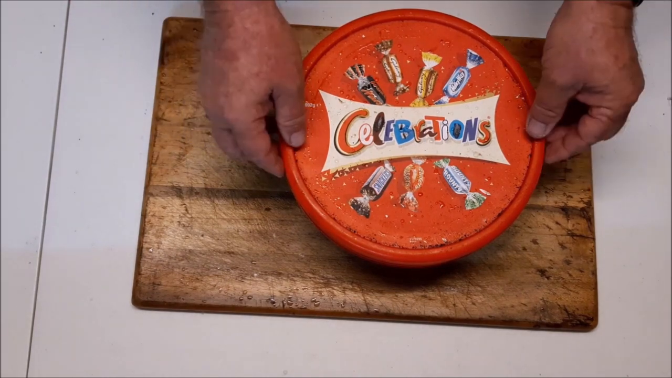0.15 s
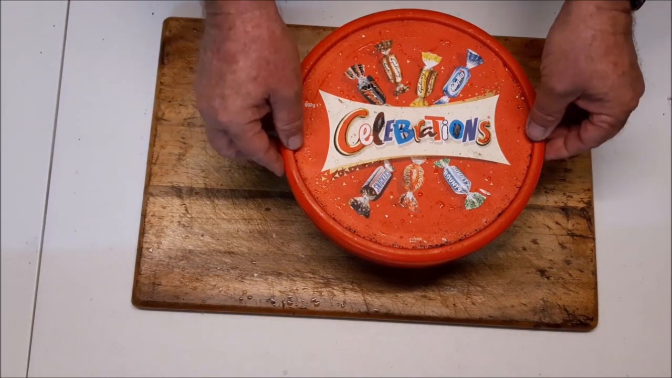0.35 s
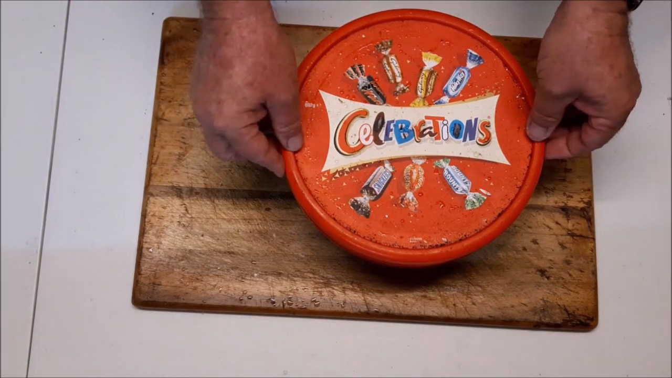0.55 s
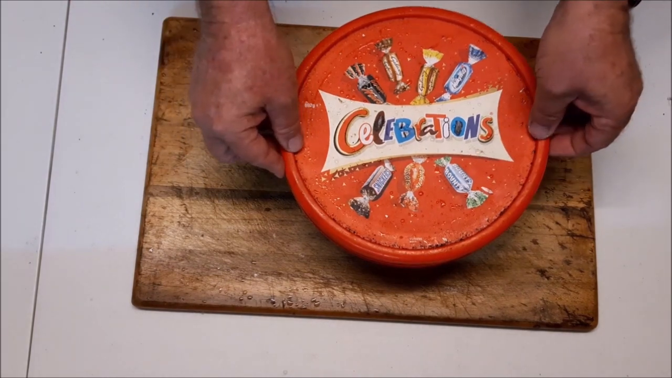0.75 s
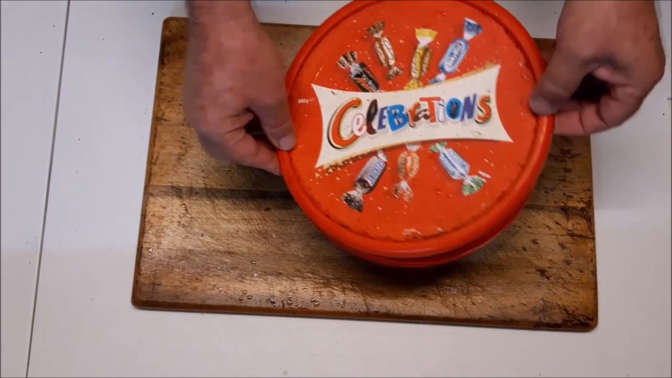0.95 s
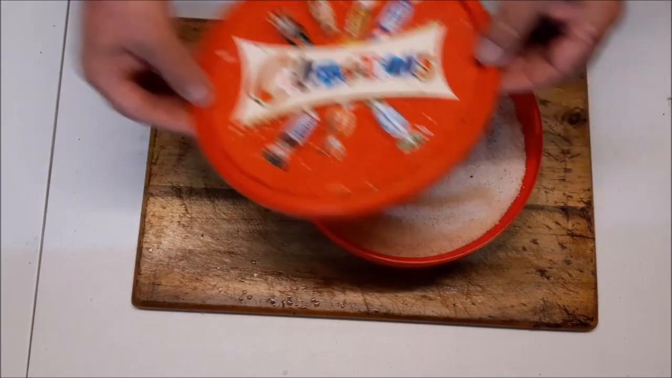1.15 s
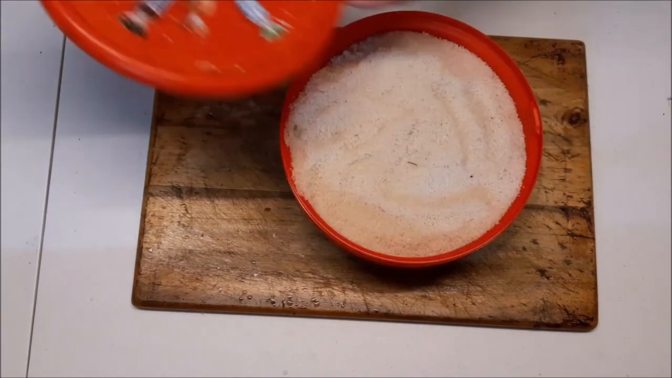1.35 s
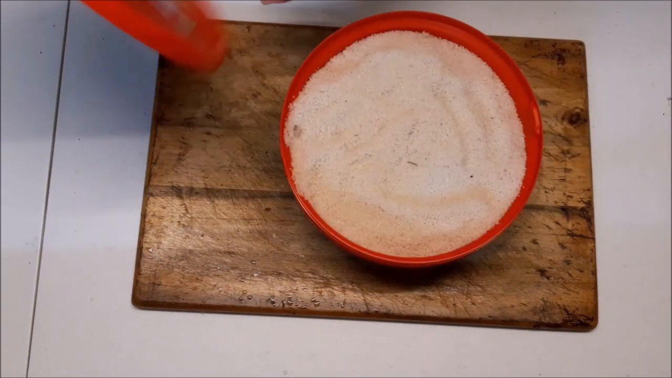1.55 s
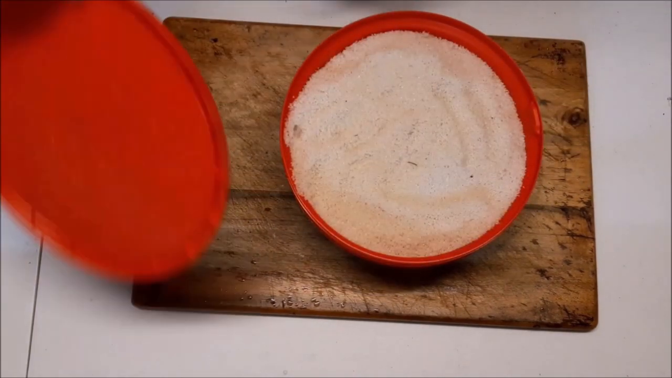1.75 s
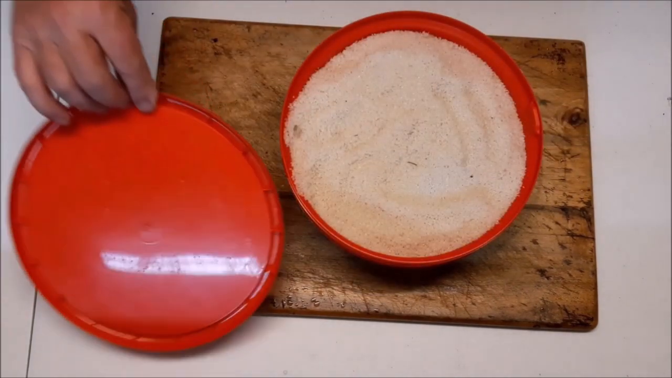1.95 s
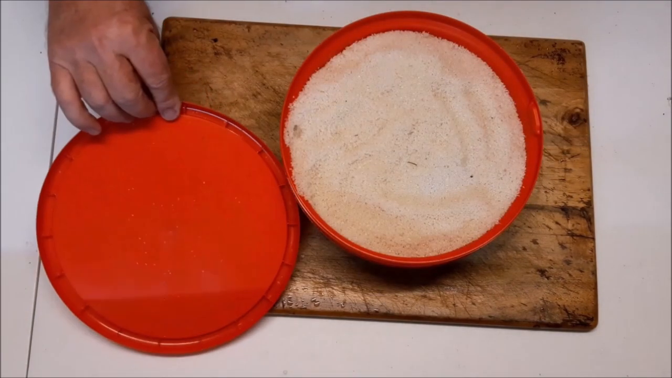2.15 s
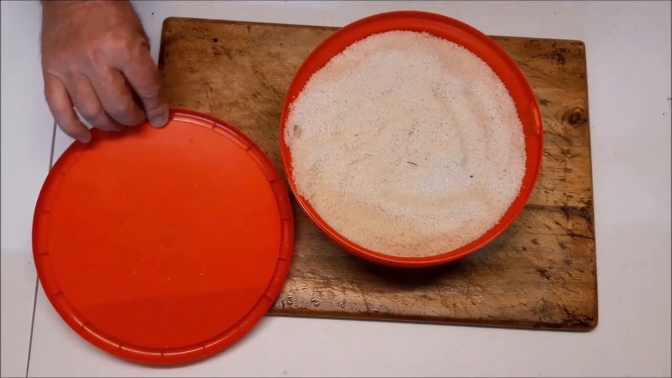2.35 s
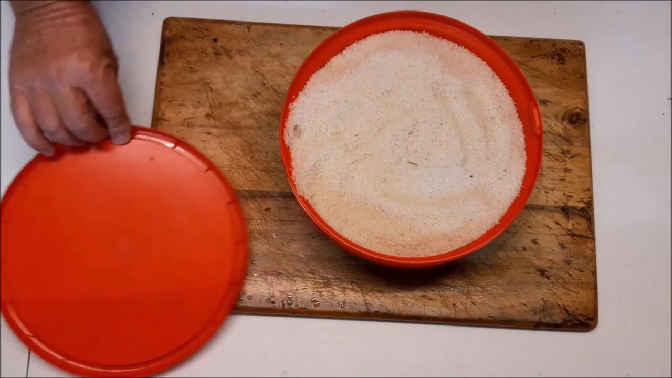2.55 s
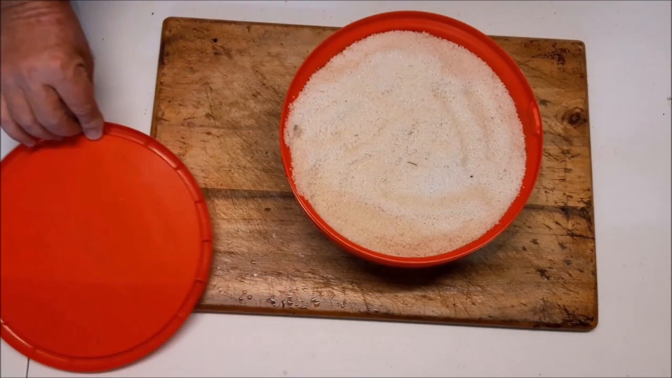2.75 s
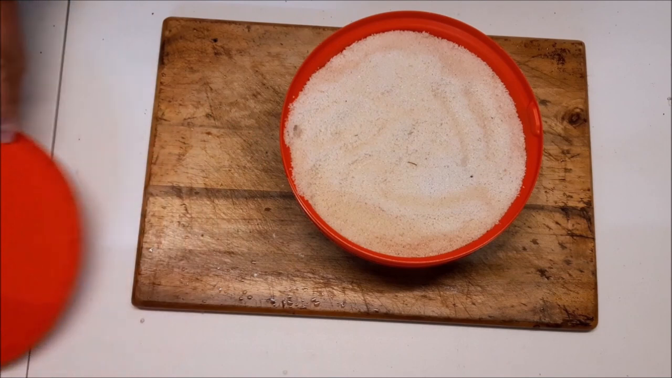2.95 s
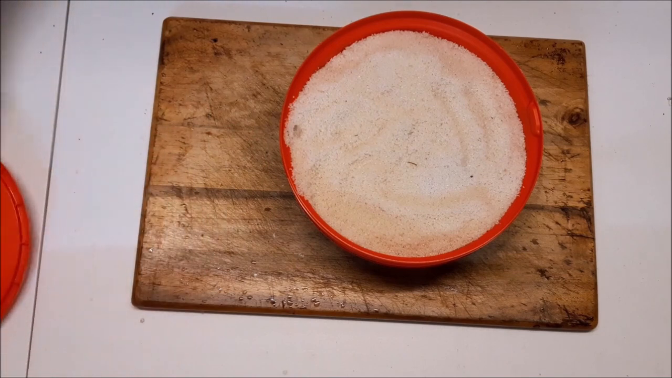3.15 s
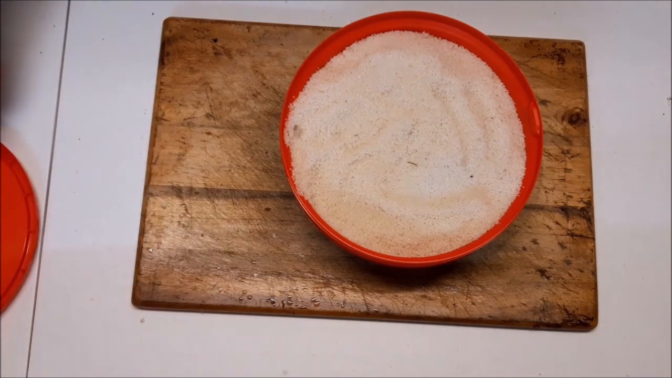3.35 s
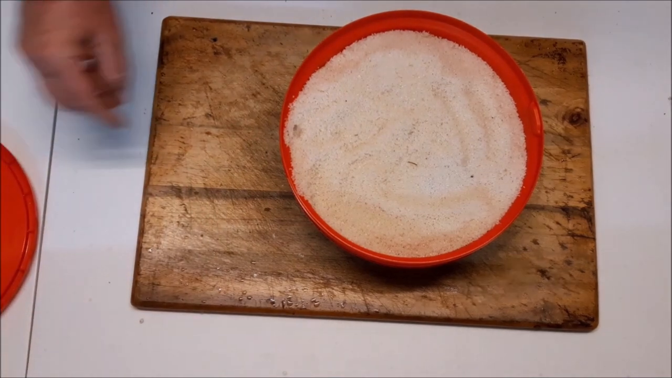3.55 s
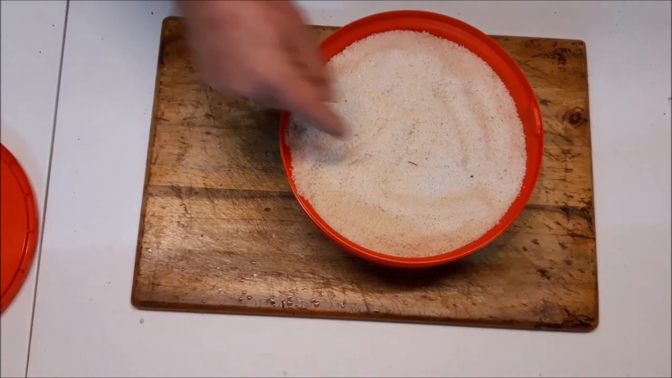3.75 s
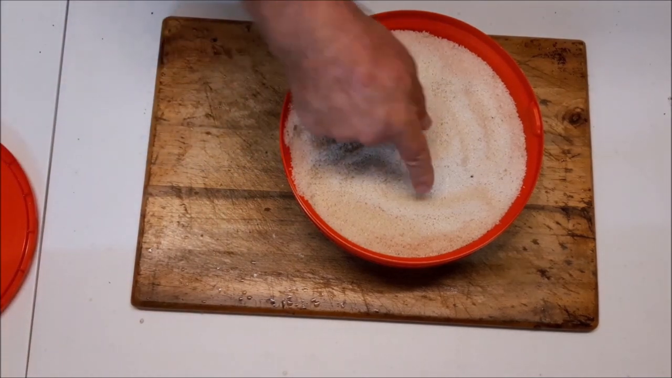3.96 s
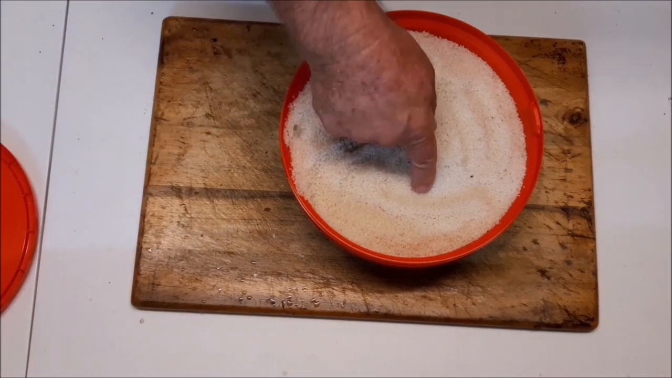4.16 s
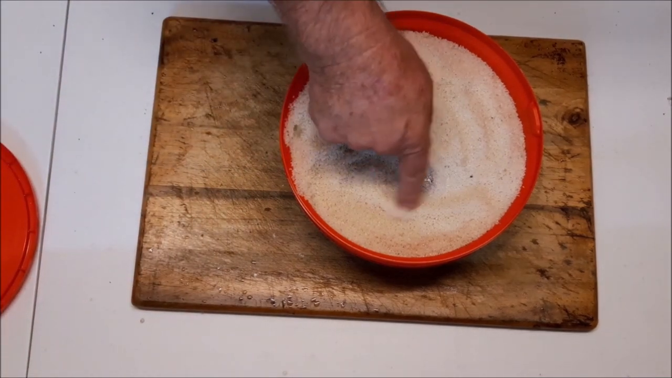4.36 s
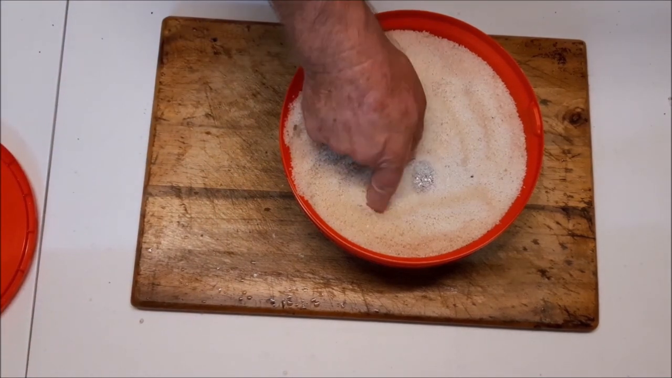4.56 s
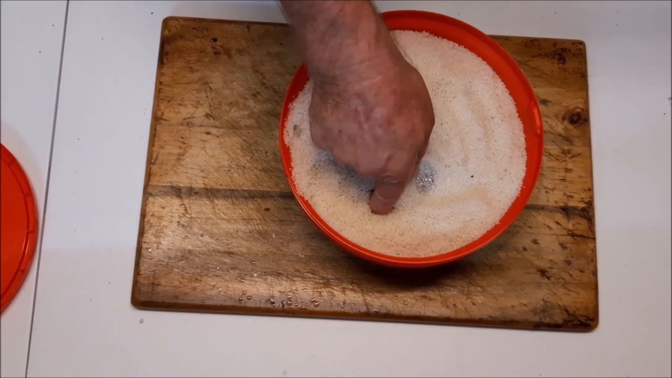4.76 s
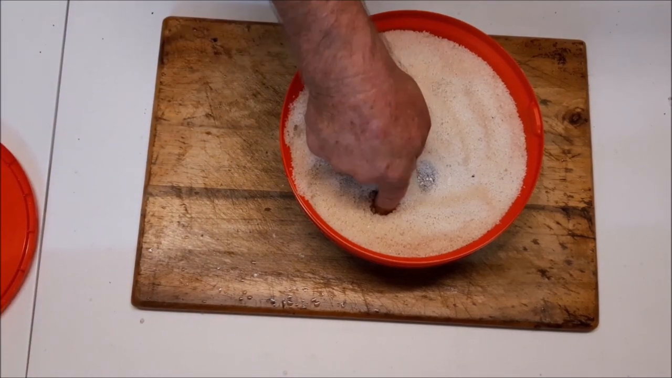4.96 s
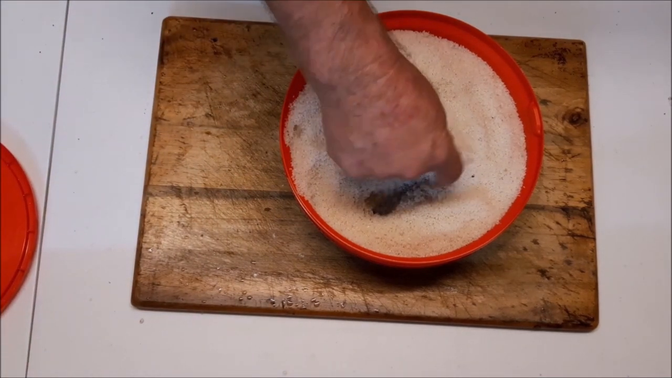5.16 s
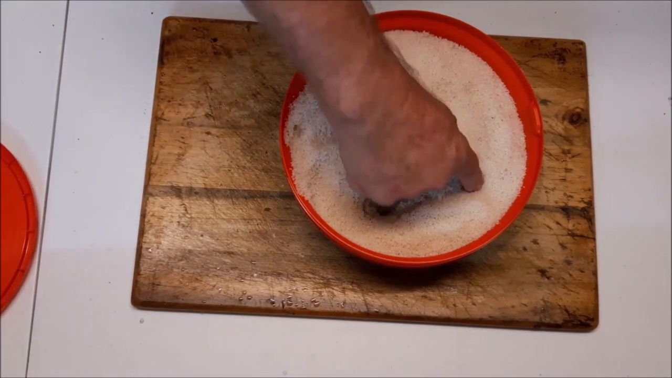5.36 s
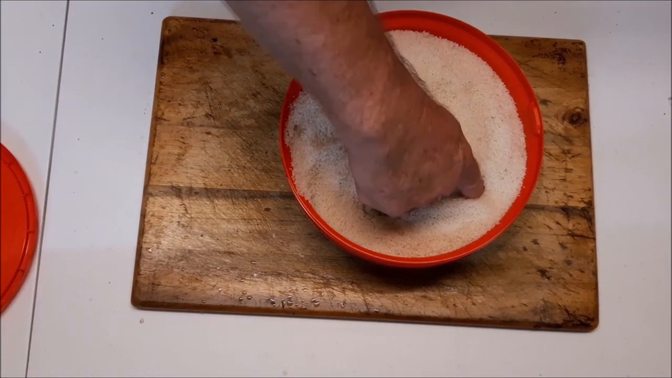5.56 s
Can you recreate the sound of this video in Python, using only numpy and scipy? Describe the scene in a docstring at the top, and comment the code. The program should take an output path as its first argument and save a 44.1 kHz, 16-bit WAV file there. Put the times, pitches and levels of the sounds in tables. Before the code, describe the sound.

A low, wavering rumble and faint hiss run throughout a small, hard-walled kitchen, with the microphone close. After a tiny tick around 0.4 s, a plastic lid is prised off a tub at 0.73-0.9 s: a dense flurry of sharp, hollow snaps with brief rasping drags and a low bump. Small ticks follow at 1.0-1.3 s, a brighter click at 1.45 s, and barely audible finger rustle until 1.65 s. The lid edge strikes the worktop loudly at 2.1 s and again at 2.2 s, then slides softly with knocks from 2.55 to 2.95 s. More clacks come at 3.1 s and a quick final clatter at 3.35 s, each with a short room tail. Quiet follows, until a finger scratches coarse salt in soft, dry, gritty strokes: short ones at 4.1-4.3 s, fuller crunches at 4.55-5.15 s, and a very faint brush at 5.4-5.55 s.

```python
"""A low rumble and a faint hiss come first and last throughout: a wavering sine, resonant noise, coloured noise.
A plastic lid is prised off a tub in a hard-walled kitchen: impulses ring damped modes, stick-slip drives them.
Fingers rustle on the lid in the air; it is knocked and slid on the worktop and laid down, by the same principles.
Then a finger scrapes through the coarse salt in the tub: clumped random grains, shaped in spectrum.
The room answers with early echoes and a diffuse, decaying tail of noise."""
import sys
import numpy as np
from scipy import signal
from scipy.fft import rfft, irfft
from scipy.io import wavfile

SR = 44100
rng = np.random.default_rng(int(sys.argv[2]) if len(sys.argv) > 2 else 0)


def wav_record(signal):
    """Record a signal, one row per channel, as 16-bit PCM in the file named by sys.argv[1]."""
    frames = np.transpose(np.atleast_2d(signal))
    bounded = np.clip(frames, -1, 1)
    # unit amplitude maps onto the largest positive 16-bit level
    quanta = np.round(bounded * 32767).astype(np.int16)
    wavfile.write(sys.argv[1], SR, quanta)


N = 247080

# Level of the low hum: time_s, level_db
HUM_LEVELS = [(0.0, -61), (0.11, -54.5), (0.58, -63), (0.81, -50), (0.86, -56), (1.64, -49.5), (1.68, -59),
              (1.78, -54.5), (2.28, -59), (2.32, -66), (2.68, -49), (2.87, -58), (2.98, -49), (3.51, -59.5),
              (4.74, -62.5), (5.16, -74), (5.19, -65), (5.6, -58)]
# Levels of two low resonances above the hum, swelling as the lid is prised and as the worktop thumps:
# time_s, lower_db, upper_db
LOW_RESONANCE_LEVELS = [(0.0, -59, -76), (0.72, -61.5, -70.5), (0.78, -49.5, -43), (1.11, -59.5, -65),
                        (2.23, -55, -59), (2.35, -64, -67), (3.54, -55.5, -51), (3.68, -65, -64),
                        (5.52, -59.5, -63), (5.6, -58, -70.5)]
# Spectrum of the air noise: frequency_hz, relative_density_db
AIR_SPECTRUM = [(25, -33), (50, -8.5), (75, -8.5), (160, -20.5), (190, -16), (277, -22), (394, -24.5),
                (516, -25.5), (700, -21.5), (1020, -27.5), (1400, -42.5), (1890, -48), (3000, -46),
                (4250, -44.5), (16000, -47)]
# Faint steady bands in the hiss: centre_hz, width_hz (between points about 9 dB down), level_db
HISS_BANDS = [(4200, 150, -86), (6140, 860, -84)]
# Lid rim slipping off the tub, and nails ticking on it: time_s, crack_db, body_db, splinter_db, crack_hz
TUB_SNAPS = [(0.4445, -39, -60.5, -48, 3620), (0.7259, -42, -45.5, -48, 3980),
             (0.741, -26.5, -45, -50, 2800), (0.7593, -50, -28, -33, 3620), (0.7765, -22, -25.5, -41, 2390),
             (0.8054, -24, -30, -52, 2350), (0.8194, -32, -24, -49, 2080), (0.8347, -25.5, -38, -35, 4000),
             (0.8639, -35.5, -32.5, -46, 2220), (0.8744, -25.5, -26.5, -29.5, 1960),
             (0.8898, -35, -34, -37, 2980), (1.0066, -40, -50, -65, 2760), (1.0405, -42, -56, -62, 2490),
             (1.283, -45.5, -56, -47, 2350), (1.4527, -24, -56, -35.5, 2120), (1.54, -47, -59, -56, 3300)]
# Rim dragging over the tub's lip: start_s, end_s, rasp_start_db, rasp_end_db, body_over_rasp_db
PRISE_STROKES = [(0.75, 0.81, -51.5, -43, 11.5), (0.835, 0.89, -47.5, -41.5, 13), (1.0, 1.03, -67, -71, 16)]
# Modes of the tub: frequency_hz, relative_level_db, t60_s
TUB_MODES = [(203, -13, 0.15), (237, -4.5, 0.11), (281.4, -0.5, 0.11), (361, -7.5, 0.073),
             (348, 0.5, 0.041), (440, -3, 0.045), (478, -4, 0.093), (650, 2.5, 0.0049), (798, -6, 0.063),
             (1080, -12, 0.01), (1390, -6, 0.0048), (1970, -18.5, 0.023)]
# Spectrum of rubbed plastic: frequency_hz, relative_density_db
RASP_SPECTRUM = [(880, -89), (1500, -15), (1670, 2.5), (3180, -2), (5710, -4), (6180, -6.5), (7030, -2.5),
                 (16000, -25.5)]
# Fingers shifting on the lid in the air: start_s, end_s, rustle_start_db, rustle_end_db
HANDLING_STROKES = [(1.292, 1.42, -68, -79), (1.5, 1.64, -76, -75)]
# Lid edge striking the worktop: time_s, crack_db, body_db, splinter_db, crack_hz
LID_KNOCKS = [(2.0925, -17, -23.5, -26, 2100), (2.1939, -26, -29, -38.5, 2360),
              (2.5457, -68, -43.5, -52, 2030), (2.6625, -44, -50, -46, 2040), (2.7525, -18, -30, -39, 2340),
              (2.891, -31.5, -48.5, -52, 2640), (2.9494, -33.5, -52, -64, 2480),
              (3.1048, -21, -31, -39, 2210), (3.1411, -40, -34, -42.5, 2000),
              (3.1638, -32, -43.5, -44.5, 2910), (3.3385, -49, -55, -43, 2800),
              (3.3514, -30, -30, -35, 2020), (3.3585, -22.5, -28, -33.5, 2940),
              (3.3833, -21, -46.5, -39, 2010)]
# Lid sliding on the worktop: start_s, end_s, rasp_start_db, rasp_end_db, body_over_rasp_db
SLIDE_STROKES = [(2.553, 2.668, -56.5, -57, 1.5), (2.81, 2.958, -57, -56.5, 0.5),
                 (3.334, 3.36, -54, -49.5, 4), (3.395, 3.425, -63, -57, 14), (3.5, 3.57, -68, -63, -5)]
# Modes of the lid: frequency_hz, relative_level_db, t60_s
LID_MODES = [(195.4, -9.5, 0.19), (290, -1, 0.027), (337, -1.5, 0.029), (434, 0.5, 0.025),
             (590, -4.5, 0.022), (603, -19.5, 0.081), (663, -9.5, 0.046), (824, -1.5, 0.043),
             (815, 3.5, 0.019), (1062, -1.5, 0.014), (1228, -10, 0.023), (1520, -3, 0.016),
             (1610, 0.5, 0.0049), (2400, -14.5, 0.0085), (2454, -15, 0.018), (2900, -5, 0.0082),
             (3620, 0, 0.0022)]
# Finger strokes in the salt: start_s, end_s, crunch_start_db, crunch_end_db, brightness_db
SALT_STROKES = [(4.133, 4.215, -67.5, -76, 1), (4.237, 4.285, -67, -56, 3), (4.299, 4.328, -58.5, -60, 5.5),
                (4.535, 4.594, -69.5, -59, -10), (4.619, 4.739, -55, -50.5, 1.5),
                (4.838, 4.904, -64.5, -59.5, 3.5), (4.927, 5.058, -62.5, -65, 3),
                (5.099, 5.173, -53, -74.5, 0.5), (5.368, 5.565, -76, -73, 9.5)]
# Spectrum of the grinding crystals: frequency_hz, relative_density_db
SALT_SPECTRUM = [(710, -11), (1200, -3), (1280, -8.5), (1590, -0.5), (1910, -6.5), (2320, -3.5),
                 (4410, -5.5), (6370, -5), (9930, -13.5), (11700, -17.5), (14000, -27), (16000, -26)]
# Diffuse decay of the kitchen: frequency_hz, t60_s, relative_level_db
ROOM_DECAY = [(124, 0.16, -10), (300, 0.3, 1), (700, 0.31, 2), (1500, 0.34, 3.5), (3700, 0.38, 0),
              (12200, 0.32, -1)]
# First echoes: delay_s, level_db
EARLY_ECHOES = [(.0028, -9), (.0052, -12), (.016, -16.5), (.021, -11)]

AIR_DB = -57.5
CUTOFF_HZ = 15800
RUB_ATTACK_DB_PER_S, RUB_RELEASE_DB_PER_S = 887, 700.0
DIG_ATTACK_DB_PER_S, DIG_RELEASE_DB_PER_S = 800.0, 752


def from_db(db):
    """Amplitude ratio: 20 dB is a factor of ten."""
    return 10 ** (np.asarray(db) / 20)


def rms_one(x):
    """Normalisation of mean power to one."""
    return x / np.sqrt(np.mean(x ** 2) + 1e-20)


def filtered(x, order, hz, kind="low"):
    """Butterworth filtering: a maximally flat passband."""
    return signal.sosfilt(signal.butter(order, hz, kind, fs=SR, output="sos"), x)


def in_time(rows):
    """Gain envelopes: each level column is interpolated in dB over time."""
    time_s, *columns = np.transpose(rows)
    return [from_db(np.interp(np.arange(N) / SR, time_s, column)) for column in columns]


def at_hz(points, hz, axis=1):
    """Interpolation of a table column over logarithmic frequency."""
    points = np.array(points)
    return np.interp(np.log(hz), np.log(points[:, 0]), points[:, axis])


def coloured(x, spectrum):
    """Spectral shaping: multiplication in the frequency domain, then unit rms."""
    hz = np.maximum(np.arange(N // 2 + 1) * SR / N, 1)
    return rms_one(irfft(rfft(x) * from_db(at_hz(spectrum, hz)), N))


def drift(rate_hz):
    """Slow random fluctuation: white noise through two equal low-pass poles, scaled to unit rms."""
    r = np.exp(-2 * np.pi * rate_hz / SR)
    noise = rng.standard_normal(N + SR)
    return rms_one(signal.lfilter([1], [1, -2 * r, r * r], noise)[SR:])      # skip a second of settling


def ring(force, hz, t60):
    """Damped resonance: a unit impulse excites a decaying sine of initial height about one."""
    r, w = from_db(-60 / (t60 * SR)), 2 * np.pi * hz / SR
    return signal.lfilter([0, np.sin(w)], [1, -2 * r * np.cos(w), r * r], force + 1e-18)


def grit(per_s, spread_db, clump_db, clump_rate):
    """Random impulse process: tiny slips of uneven size and sign, in clumps; unit rms."""
    sizes = from_db(spread_db * np.minimum(rng.exponential(1, N), 5)) * rng.choice([-1, 1], N)
    occurs = rng.random(N) < per_s / SR
    return rms_one(sizes * occurs * from_db(clump_db * drift(clump_rate)))


def strokes(rows, attack_db_per_s, release_db_per_s):
    """Stroke envelopes: exponential rise, a glide in dB from start to end level, exponential fall."""
    time = np.arange(N) / SR
    return np.array([from_db(np.interp(time, [start, end], [first_db, last_db])
                             - attack_db_per_s * np.maximum(start - time, 0)
                             - release_db_per_s * np.maximum(time - end, 0))
                     for start, end, first_db, last_db, *_ in rows])


def background():
    """Tonal and random noise: a frequency-wavering hum, two noise-driven low resonances, coloured air noise."""
    [hum], [lower, upper] = in_time(HUM_LEVELS), in_time(LOW_RESONANCE_LEVELS)
    white = rng.standard_normal((3, N))
    hum_hz = 68 + 4.09 * drift(3.79)
    out = hum * np.sqrt(2) * np.sin(2 * np.pi * np.cumsum(hum_hz) / SR)
    out += lower * rms_one(ring(white[1], 96.95, 0.46))
    out += upper * rms_one(ring(white[0], 134.3, 0.31))
    out += from_db(AIR_DB + 1.0 * drift(2.4)) * coloured(white[2], AIR_SPECTRUM)
    for hz, width, db in HISS_BANDS:
        out += from_db(db) * rms_one(ring(white[0], hz, 5.7 / width))
    return out


def struck(events, modes, scatter_db, crack_s, sharpness, click_low_hz):
    """Modal impact: each blow excites every mode unevenly, with a short crack and a burst of splintery treble."""
    s, crack, body, splinter, crack_hz = np.transpose(events)
    at, out = np.round(s * SR).astype(int), np.zeros(N)
    luck = rng.standard_normal((len(at), len(modes)))
    for k, (hz, level_db, t60) in enumerate(modes):
        force = np.zeros(N)
        force[at] = (-1) ** k * from_db(body + level_db + scatter_db * luck[:, k])
        out += ring(force, hz, t60)
    out = filtered(out, 2, 4000)      # plastic is a soft contact

    tail = np.arange(600) / SR
    bursts = rng.standard_normal((len(at), len(tail))) * from_db(-60 * tail / 0.012)
    bursts[:, 0] = -sharpness      # the first contact is one sharp click
    bursts = filtered(bursts, 2, [click_low_hz, 7000], "band")
    bursts = filtered(bursts, 2, 11500)      # little above the band

    phase = 2 * np.pi * crack_hz[:, None] * tail
    partials = -(np.sin(phase) - 0.38 * np.sin(1.62 * phase))
    onset = 1 - np.exp(-tail / 0.00018)
    rings = partials * from_db(-60 * tail / crack_s) * onset      # crack_s is the t60
    pulses = from_db(crack)[:, None] * rings + from_db(splinter)[:, None] * bursts
    for i, pulse in zip(at, pulses):
        out[i:i + len(tail)] += pulse
    return out


def rubbed(rows, modes, per_s, uneven_db):
    """Stick-slip friction: slips of plastic on a hard edge drive the modes and rasp in the treble."""
    gains = strokes(rows, RUB_ATTACK_DB_PER_S, RUB_RELEASE_DB_PER_S)
    rasp = gains.sum(axis=0)
    body = from_db(np.array(rows)[:, -1]) @ gains
    slips = grit(per_s, uneven_db, clump_db=6.0, clump_rate=43.5)
    # approximate rms of all the modes under unit white noise
    modal_rms = np.sqrt(sum(from_db(2 * db) * t60 * SR / 27.6 for hz, db, t60 in modes))
    rung = sum(from_db(db) * ring(slips * body, hz, t60) for hz, db, t60 in modes) / modal_rms
    return rung + rasp * coloured(slips, RASP_SPECTRUM)


def tub_prised():
    """Impact and friction on the tub: its modes answer the snaps and the drag, without deep bass."""
    out = struck(TUB_SNAPS, TUB_MODES, scatter_db=4.0, crack_s=0.0033, sharpness=4.4, click_low_hz=2940)
    out += rubbed(PRISE_STROKES, TUB_MODES, 900.0, uneven_db=2.5)
    return filtered(out, 3, 150, "high")


def handling():
    """Light friction: skin brushing smooth plastic gives a soft treble rustle."""
    level = strokes(HANDLING_STROKES, RUB_ATTACK_DB_PER_S, RUB_RELEASE_DB_PER_S).sum(axis=0)
    return level * coloured(grit(6200.0, 3.1, clump_db=4.0, clump_rate=32.0), RASP_SPECTRUM)


def lid_on_worktop():
    """Impact and friction on the lid: its modes answer the knocks and the slide, without deep bass."""
    out = struck(LID_KNOCKS, LID_MODES, scatter_db=2.23, crack_s=0.0026, sharpness=10.5, click_low_hz=453)
    out += rubbed(SLIDE_STROKES, LID_MODES, 3000.0, uneven_db=3.0)
    return filtered(out, 3, 150, "high")


def salt():
    """Granular friction: crystals grind past each other in clumps; a stroke's brightness scales the top."""
    gains = strokes(SALT_STROKES, DIG_ATTACK_DB_PER_S, DIG_RELEASE_DB_PER_S)
    crunch = gains.sum(axis=0)
    bright = from_db(np.array(SALT_STROKES)[:, -1]) @ gains
    grains = coloured(grit(6000.0, 2.4, clump_db=2.0, clump_rate=38.0), SALT_SPECTRUM)
    top = filtered(grains, 2, 5000, "high")
    return crunch * (grains - top) + bright * top


def kitchen(x, wet_db):
    """Reverberation: a few early echoes, then noise that swells and decays band by band."""
    time = np.arange(SR) / SR
    edges = 60 * 2 ** np.arange(0, 8.1, .5)      # half-octave bands
    white, tail = rng.standard_normal((2, SR)), 0
    for k, (low, high) in enumerate(zip(edges, edges[1:])):
        band = filtered(white[k % 2], 2, [low, high], "band")      # neighbours use separate noises
        hz = np.sqrt(low * high)
        decay_db = -60 * time / at_hz(ROOM_DECAY, hz)
        tail = tail + band * from_db(at_hz(ROOM_DECAY, hz, axis=2) + decay_db)
    tail = tail * (1 - np.exp(-time / 0.0039))
    response = from_db(wet_db) * tail / np.sqrt(np.sum(tail ** 2))
    for s, db in EARLY_ECHOES:
        response[round(s * SR)] += from_db(db)
    return signal.fftconvolve(x, response)[:N]


def scene():
    """Superposition: tub and lid fill the room; the salt is close and drier."""
    tub, lid, grains = tub_prised(), lid_on_worktop(), salt()
    to_room = from_db(-5.0) * tub + lid + from_db(-11.5) * grains
    direct = tub + lid + grains
    return (direct + kitchen(to_room, wet_db=0.0) + handling() + background())[None]


def record(dry):
    """Band limitation: the microphone drops the deepest bass; the top is cut steeply."""
    heard = filtered(dry, 2, 50, "high")
    return signal.sosfilt(signal.ellip(12, .5, 60, CUTOFF_HZ, fs=SR, output="sos"), heard)


dry = scene()
out = record(dry)
wav_record(out)
```